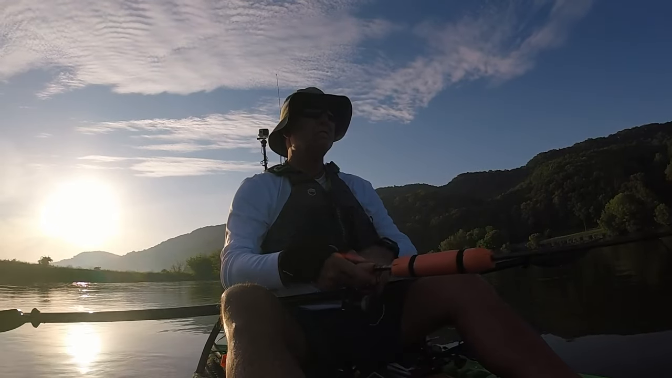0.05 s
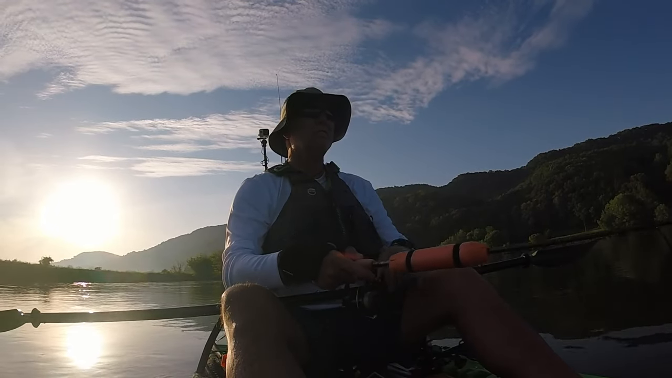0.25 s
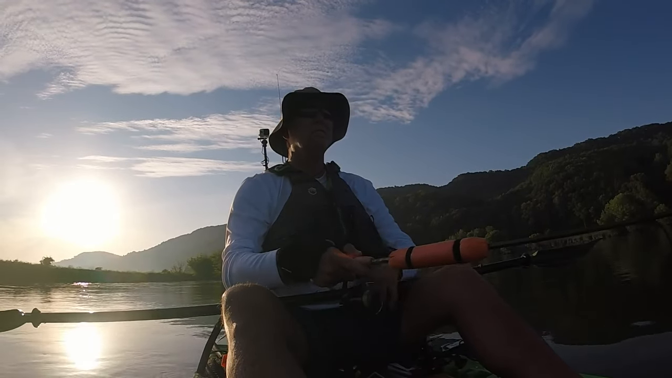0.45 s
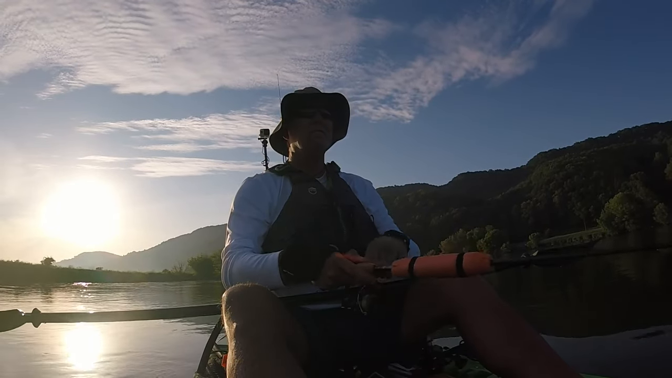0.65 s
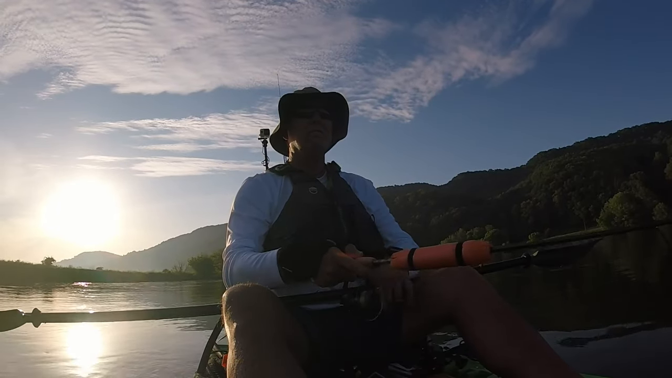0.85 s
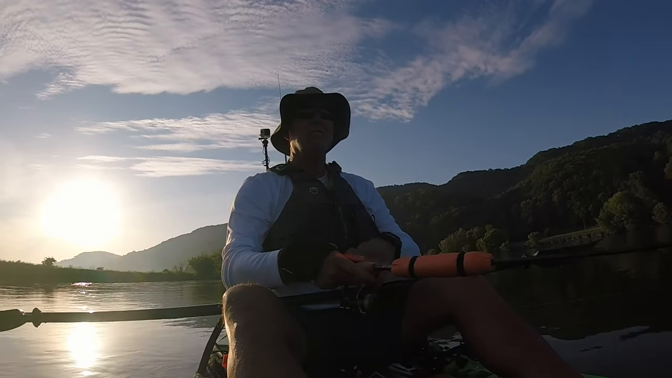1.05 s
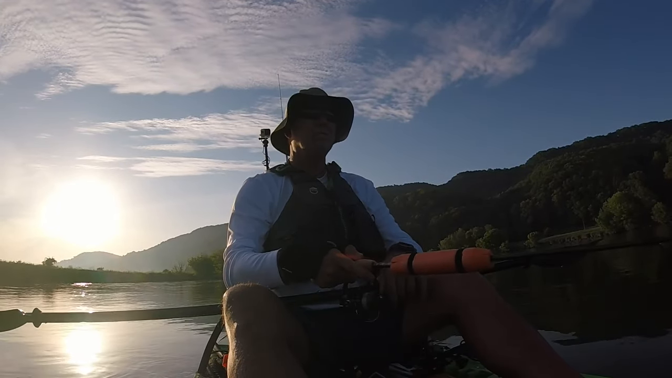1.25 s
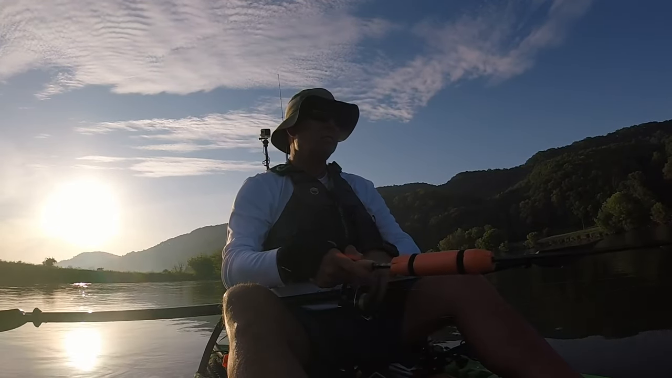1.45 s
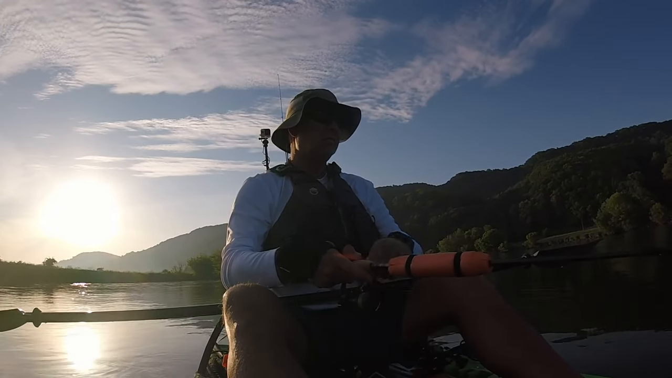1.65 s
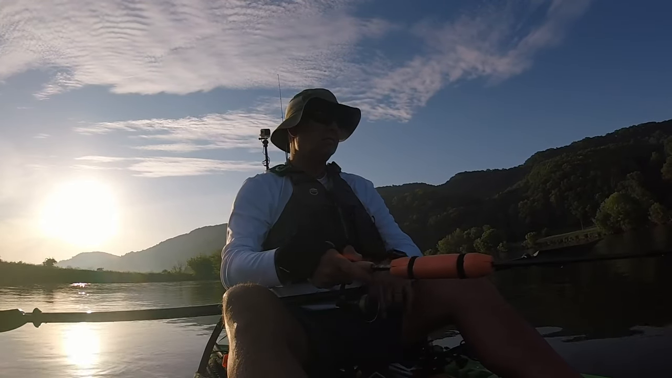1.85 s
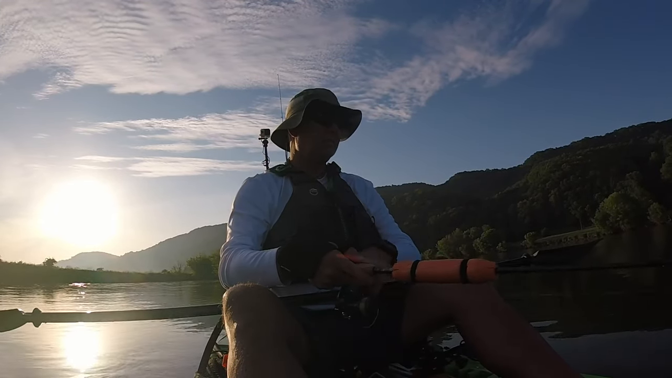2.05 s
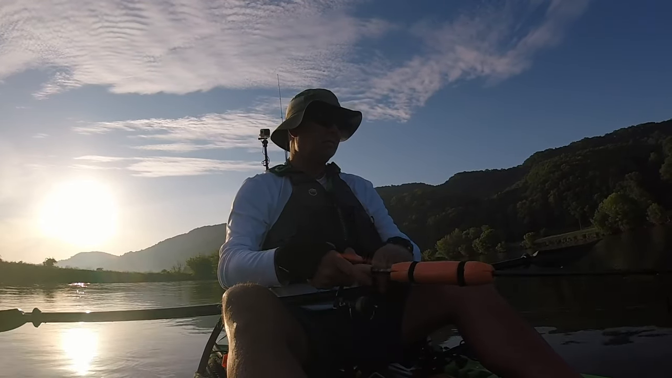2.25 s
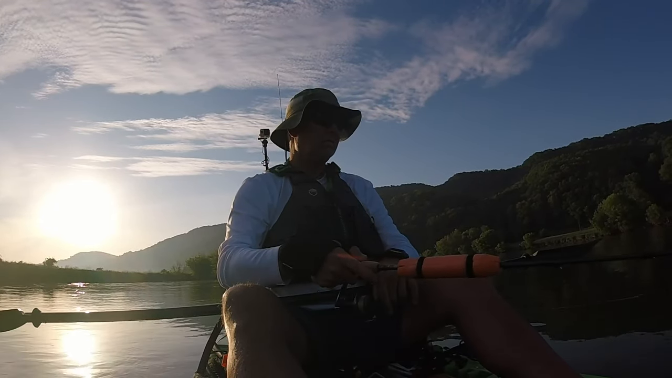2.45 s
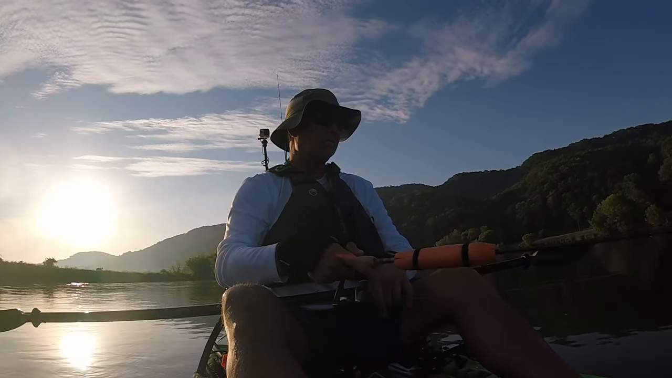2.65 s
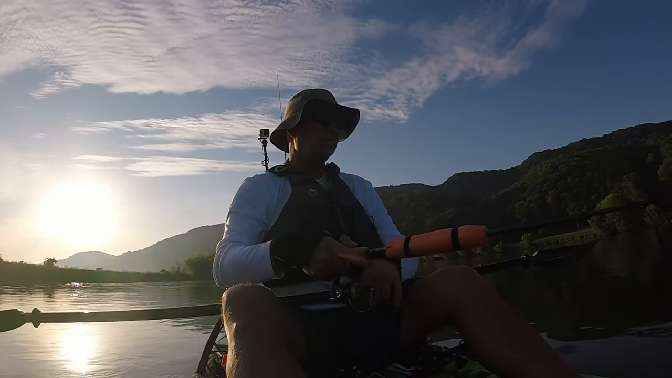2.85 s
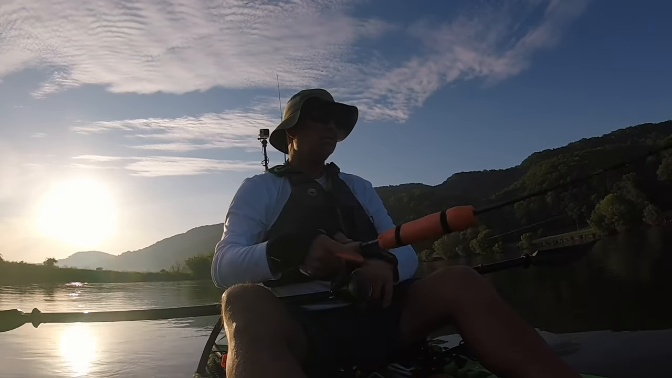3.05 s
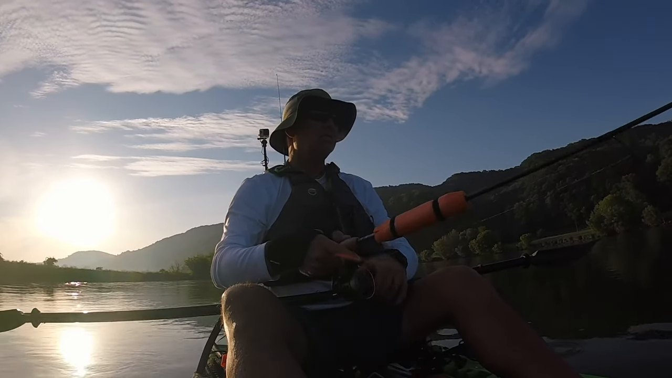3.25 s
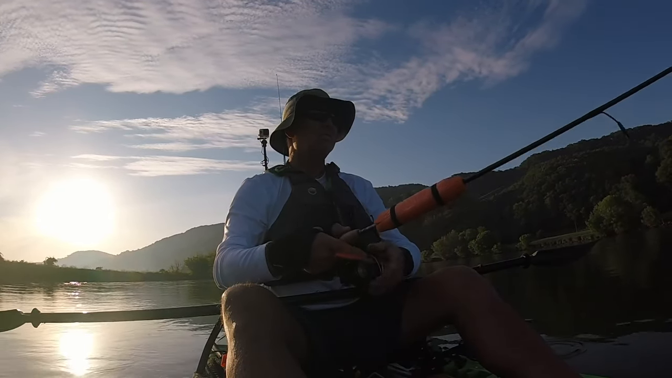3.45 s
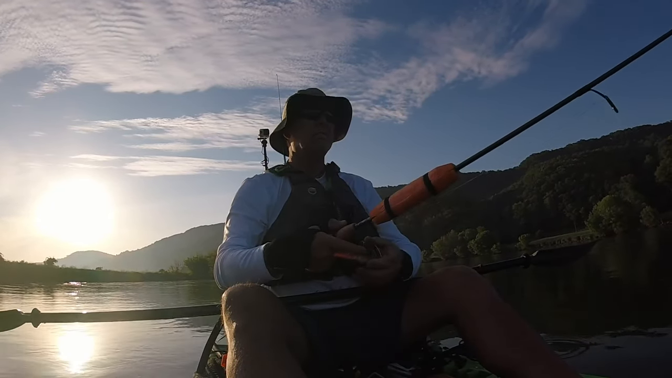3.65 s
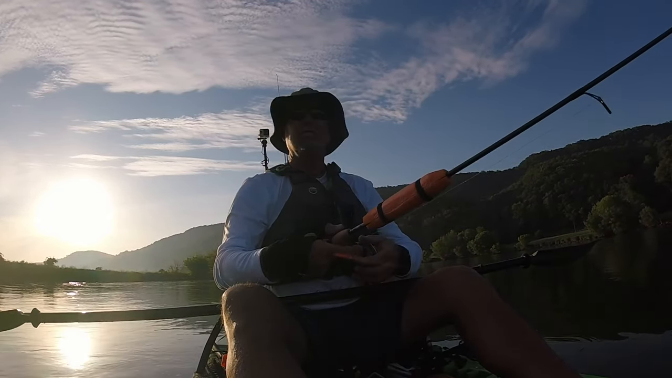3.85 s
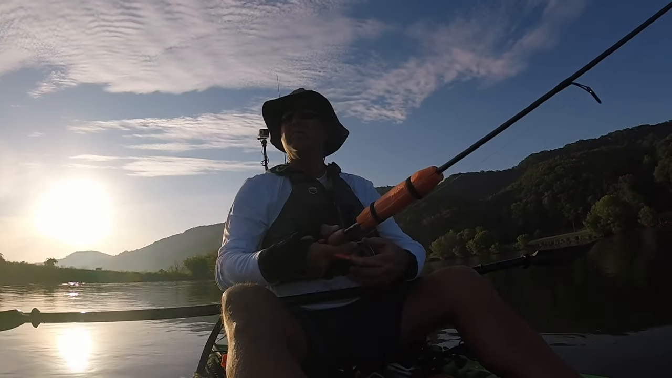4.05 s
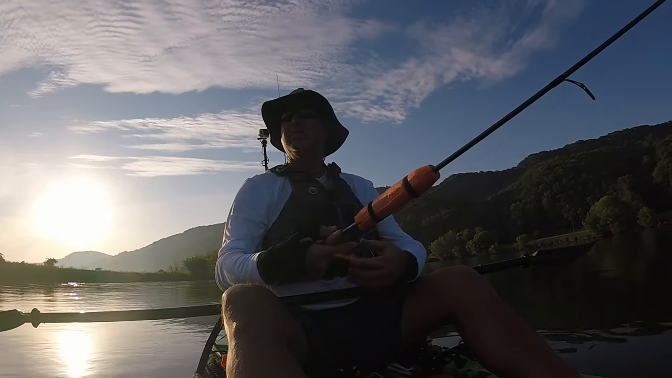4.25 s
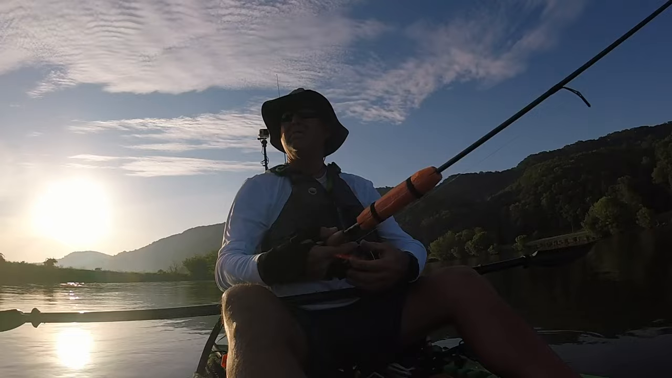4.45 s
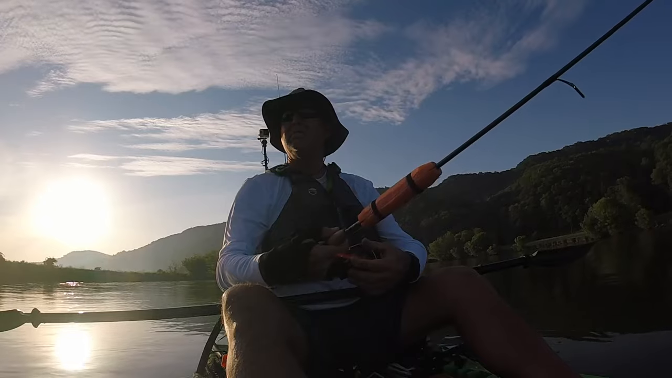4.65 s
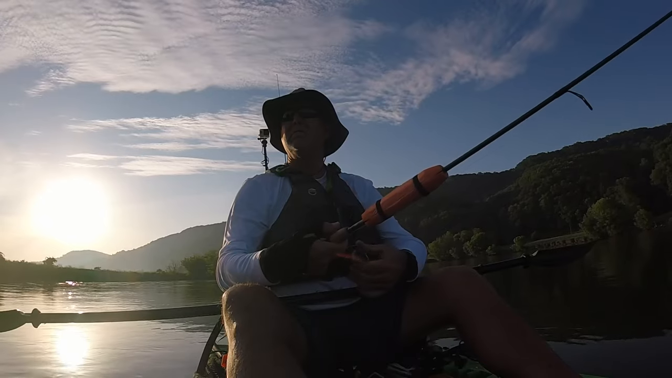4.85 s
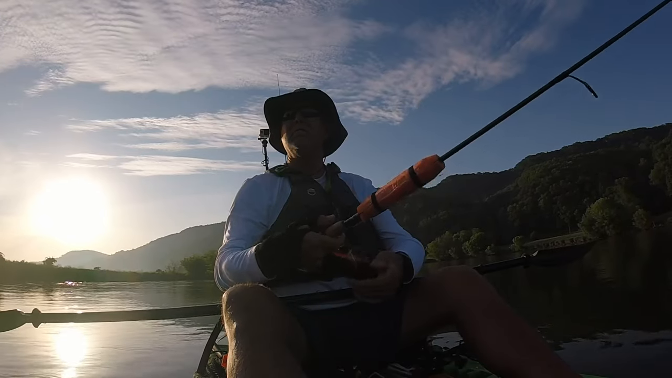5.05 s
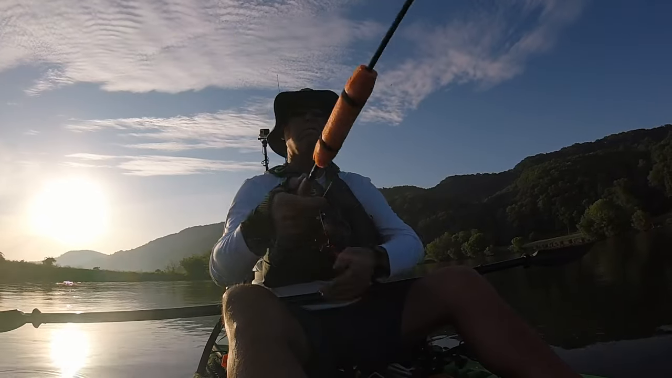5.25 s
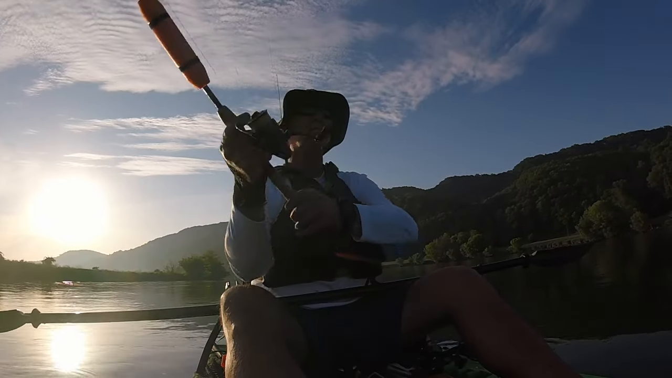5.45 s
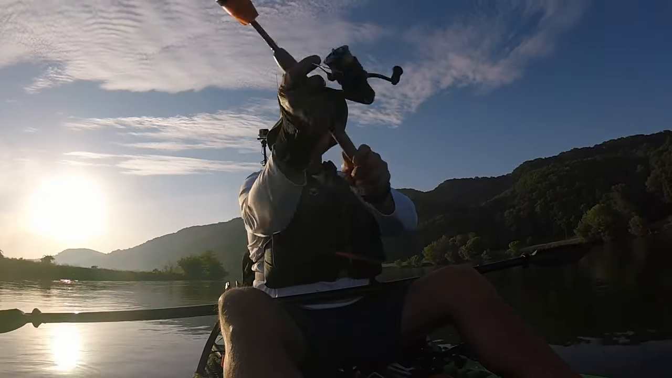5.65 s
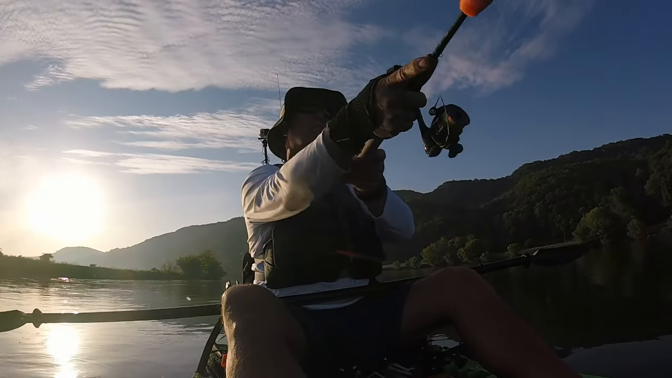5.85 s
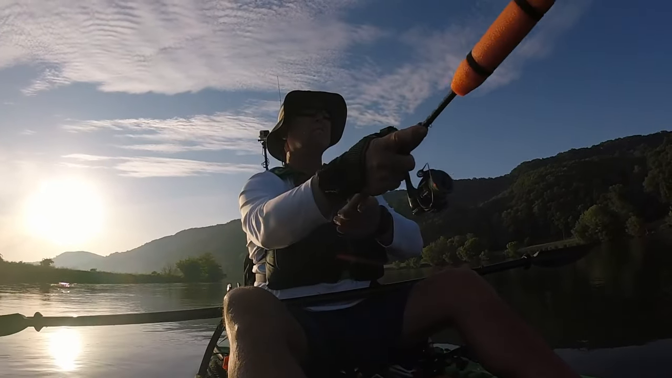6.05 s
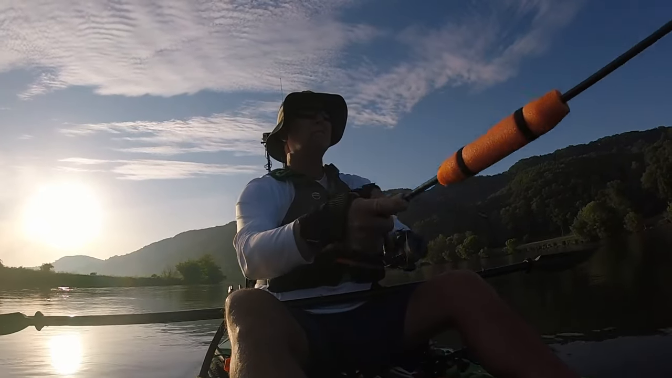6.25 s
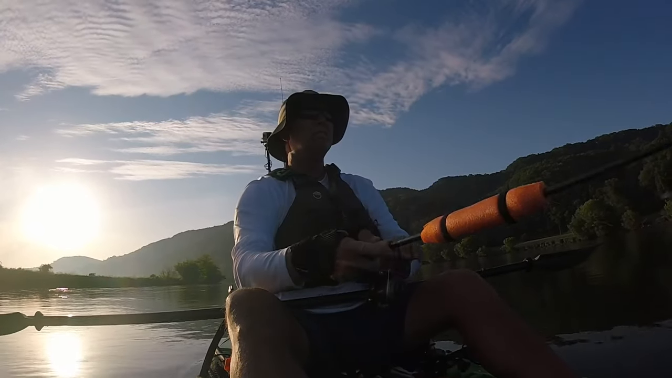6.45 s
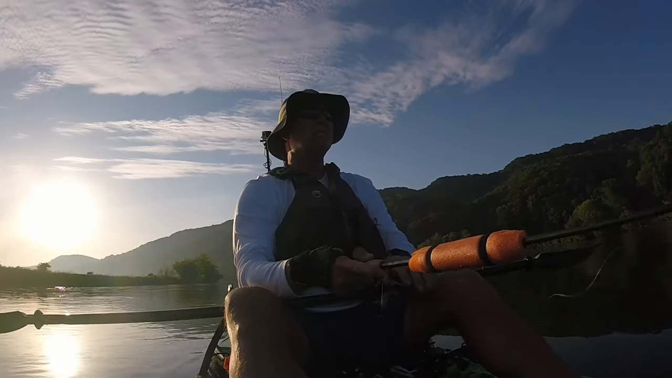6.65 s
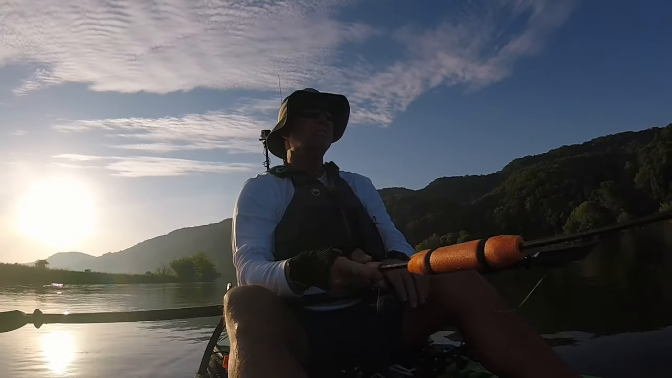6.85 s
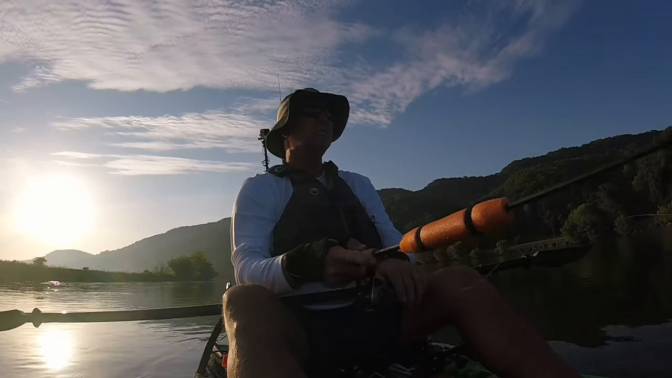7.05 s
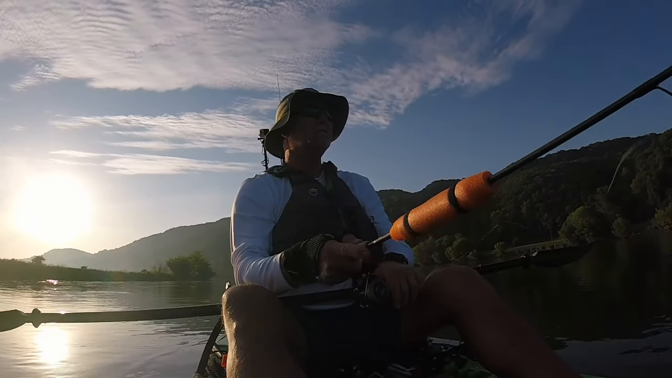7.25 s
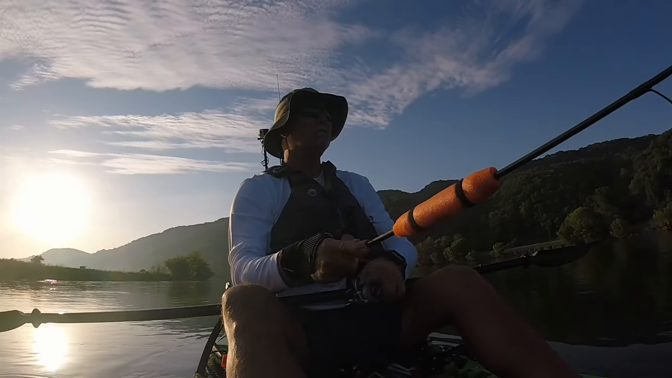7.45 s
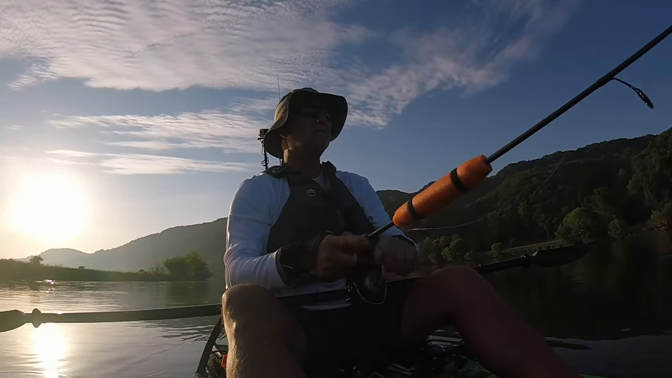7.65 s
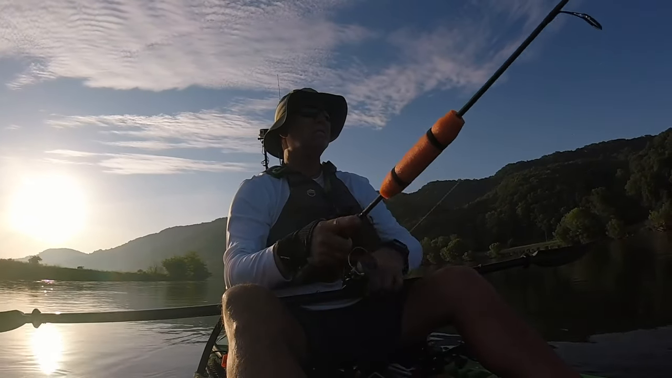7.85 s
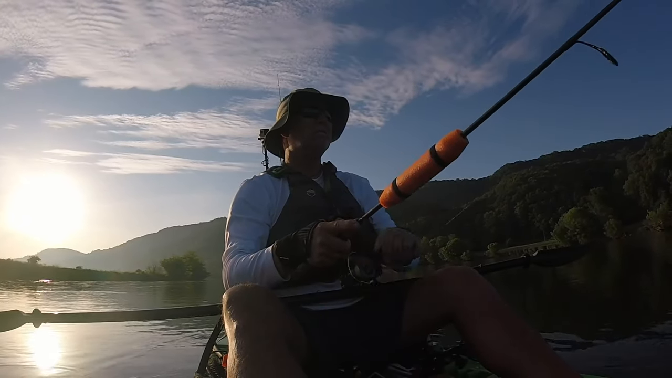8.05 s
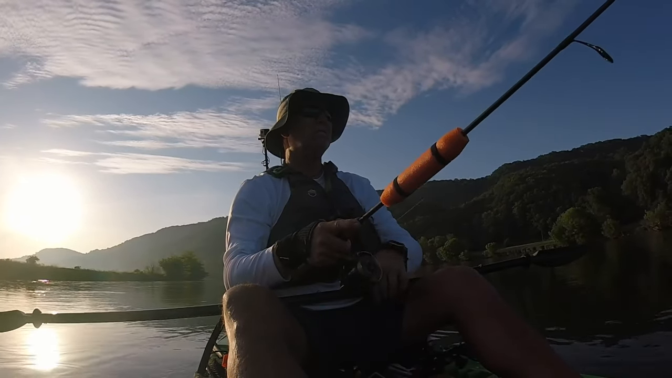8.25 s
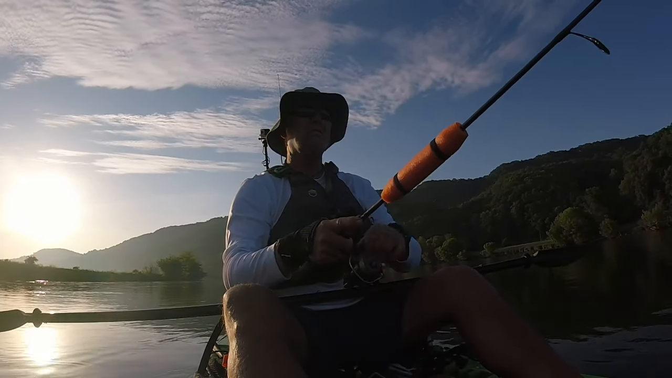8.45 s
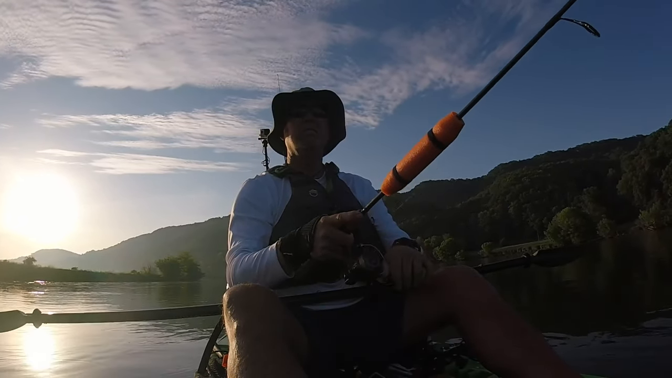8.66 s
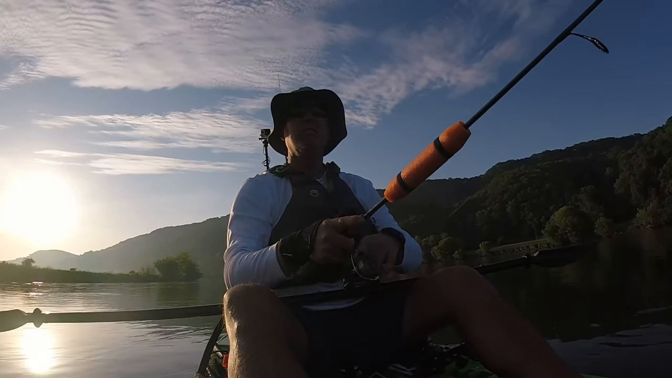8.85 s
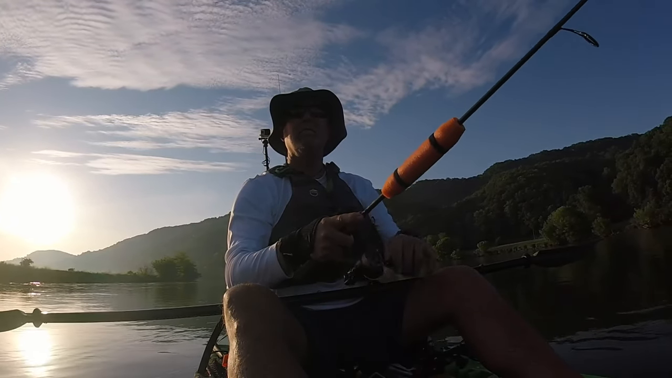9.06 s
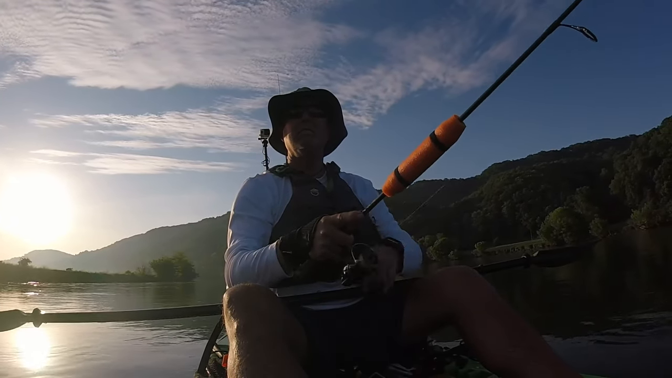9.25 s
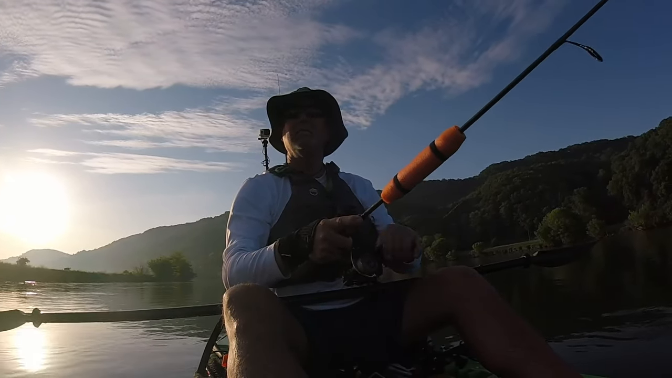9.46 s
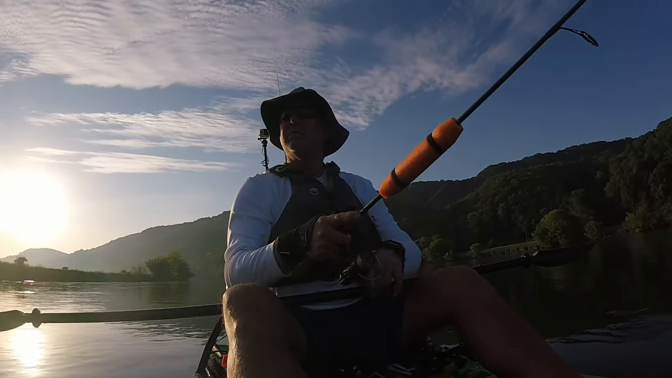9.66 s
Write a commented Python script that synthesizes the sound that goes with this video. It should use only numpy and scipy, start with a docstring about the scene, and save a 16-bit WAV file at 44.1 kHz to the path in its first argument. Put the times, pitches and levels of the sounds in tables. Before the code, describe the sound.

Quiet river air with a low wavering drone and soft hiss, heard close by a cased microphone on a kayak. From 0 to about 2.3 s a reel winds faintly, ticking and rasping, its handle moaning alternately low and high; distant birds whistle. A small double tick comes at 1.6 s, and a last low moan at 2.7. From 3 to 5 s it is nearly still, with tiny clicks and thin arching whistles. Cloth rustles from 5.2; hull thumps begin at 5.4. At 5.7 a very brief climbing swish ends in a hard woody knock and metallic rattle, and line hisses out, fading by 6.9. Little hiss puffs and rough bird calls follow. At 7.4 the bail rattles, then snaps very loudly at 7.76. From 7.85 to the end, brisk winding rasps, chirps and squeaks, with down-slurred whistles and rapid regular bird peeps from 8.5 to 9.3.

```python
"""On a still river an angler in a kayak winds in, opens the bail, casts overhead and winds again.
Gears whine and rasp as throbbing noise bands, and the handle bearing moans as gliding husky tones.
The cast swishes with a climbing band, and line hisses off the spool with a pulse for each coil.
Bail, rod and hull knock as damped modes. Birds whistle as gliding sines over a low drone.
"""
import sys
import numpy as np
from scipy import signal
from scipy.fft import rfft, irfft, next_fast_len
from scipy.io import wavfile

SR = 44100
rng = np.random.default_rng(int(sys.argv[2]) if len(sys.argv) > 2 else 0)


def dump(signal):
    """Clip the signal to [-1, 1] and save it as 16-bit WAV at the path in sys.argv[1]."""
    limited = np.clip(np.atleast_2d(signal).T, -1, 1)
    pcm = np.round(limited * 32767).astype(np.int16)
    wavfile.write(sys.argv[1], SR, pcm)


N = 428211
TIME = np.arange(N) / SR   # s

# Source levels are set ahead of the microphone case.
# modes of the reel: (frequency [Hz], level [dB], 60 dB decay time [s])
REEL_MODES = [(1200, -14, 0.0023), (2110, -27, 0.0066), (2530, -6.5, 0.0077), (3240, -6, 0.0049),
              (3730, -7, 0.0062), (4500, 0.5, 0.0029), (5020, -7.5, 0.0068), (6340, -8.5, 0.0033),
              (6900, -12, 0.0088), (7480, -5, 0.0062), (8070, -6, 0.011), (11300, -31, 0.0022),
              (10400, -31, 0.0022), (12350, -28, 0.004), (14000, -20, .003)]
NOTE_ATTACK_S = .006


def amp(db):
    """Decibels are logarithmic: 20 dB is a factor of ten in amplitude."""
    return 10 ** (np.asarray(db) / 20)


def curves(rows):
    """Linear interpolation turns columns into curves, after a gate open while the table lasts."""
    s, *columns = np.transpose(rows)
    nearest_end_s = np.minimum(TIME - s[0], s[-1] - TIME)
    gate = np.clip(nearest_end_s / .02 + (s[0] == 0), 0, 1)   # a table from 0 s starts open
    return [gate] + [np.interp(TIME, s, column) for column in columns]


def shape(x, spectrum):
    """Linear filtering: each frequency is scaled by a (frequency [Hz], level [dB]) table."""
    hz, level_db = np.transpose(spectrum)
    size = next_fast_len(N + 4000)
    bins_hz = np.maximum(np.arange(size // 2 + 1) * SR / size, 1)
    gain = amp(np.interp(np.log(bins_hz), np.log(hz), level_db))
    return irfft(rfft(x, size) * gain, size)[:N]


def coloured(spectrum, grain_db=0):
    """Filtered random noise of rms 1; grain makes single samples stand out."""
    grain = amp(grain_db * np.minimum(rng.exponential(1, N), 4))
    x = shape(rng.standard_normal(N) * grain, spectrum)
    return x / x.std()


def narrow(hz, width_hz):
    """Quadrature modulation: slow noise on a (moving) carrier makes a band of noise, rms 1."""
    low_pass = signal.butter(2, width_hz / 2, fs=SR, output="sos")
    slow = signal.sosfilt(low_pass, rng.standard_normal((2, N)))
    phase = 2 * np.pi * np.cumsum(hz + np.zeros(N)) / SR
    x = slow[0] * np.cos(phase) + slow[1] * np.sin(phase)
    return x / x.std()


def ring(force, hz, t60):
    """A damped resonator: a unit click sets a sine of height 1 ringing, 60 dB down after t60 s."""
    r, w = amp(-60 / (t60 * SR)), 2 * np.pi * hz / SR
    return signal.lfilter([0, np.sin(w)], [1, -2 * r * np.cos(w), r * r], force + 1e-18)


def swell(peak_s, peak_db, rise, fall):
    """Exponential growth and decay: gain climbs and dies evenly, in dB per s."""
    before_s, after_s = np.maximum(peak_s - TIME, 0), np.maximum(TIME - peak_s, 0)
    return amp(peak_db - rise * before_s - fall * after_s)


def add(out, s, piece):
    """Superposition: a piece is mixed in at time s."""
    i = round(s * SR)
    out[i:i + len(piece)] += piece[:N - i]


def background():
    """Random amplitude modulation: low noise bands waver as a drone and buffet as wind and hull motion."""
    # low drone: (frequency [Hz], width [Hz], level [dB])
    drone_bands = [(168.1, 37, -55), (239.2, 7.5, -54.5), (295, 14.3, -64.5), (326.7, 8.3, -65),
                   (347.2, 29, -64)]
    # wind and hull movement at the microphone: (time [s], level [dB])
    buffet_levels = [(4.4, -59.5), (5.4, -47), (5.75, -43), (6.4, -44), (6.7, -48), (8.0, -47.5),
                     (9.71, -49)]
    gate, buffet_db = curves(buffet_levels)
    drone = 0
    for hz, width_hz, db in drone_bands:
        drone = drone + amp(db + 1.82 * narrow(0.415, 0.64)) * narrow(hz, width_hz)
    rumble = narrow(175, 115) + amp(-12.0) * narrow(335, 42)
    return drone + gate * amp(buffet_db + 1.7 * narrow(4, 6.4)) * rumble


def moan(hz, blur_share):
    """Complex modulation: a gliding carrier bears slow noise, a narrow core inside a wider blur."""
    white = rng.standard_normal((2, N)) + 1j * rng.standard_normal((2, N))
    core = signal.sosfilt(signal.butter(2, 24, fs=SR, output="sos"), white[0])
    blur = signal.sosfilt(signal.butter(2, 140, fs=SR, output="sos"), white[1])
    husk = .3 + core / core.std() + blur_share * blur / blur.std()   # .3 is the steady tone
    return np.real(husk * np.exp(2j * np.pi * np.cumsum(hz) / SR))


def chorus():
    """Incoherent addition of far birds: husky strands wander in pitch and come and go."""
    level = amp(-65 - 1.5 * TIME)   # fades by 1.5 dB per s
    out = 0
    for hz in (2150, 2850, 3400):
        presence = np.clip(narrow(1.5, 4) - .4, 0, 1)
        out = out + presence * moan(hz * (1 + .04 * narrow(2, 4)), .5)
    return level * out


def winding():
    """Periodic modulation: gear whine and grainy rasp throb once per rotor turn, the treble in patches."""
    # spells of winding, each of rows: (time [s], whine level [dB], rasp level [dB])
    spells = [
        [(0, -79, -63.5), (2.2, -89, -65), (2.4, -96, -82), (3.2, -100, -68)],
        [(7.79, -57, -64), (7.85, -61, -52), (8.5, -62.5, -53.5), (9.2, -60, -52), (9.71, -65, -52)],
    ]
    # gear rasp: (frequency [Hz], spectral density [dB per Hz])
    rasp_colour = [(700, -11), (1100, -2), (1600, -4.5), (1850, 6.5), (2050, -2.5), (2300, 3), (2600, 4),
                   (3400, -1.5), (4250, -5), (5700, -1.5), (6300, -1), (8700, -1.5), (9300, -15.5),
                   (12000, -15), (16000, -58)]
    rotor_turns_per_s = 12.8
    turn = np.cos(2 * np.pi * rotor_turns_per_s * TIME + 2.0 + 0.56 * narrow(0.388, 1.0))
    out = 0
    for rows in spells:
        gate, whine_db, rasp_db = curves(rows)
        whine = amp(whine_db + 2 * turn + 1.5 * narrow(12, 20)) * narrow(5130, 190)
        patches = sum(amp(5 * turn + 3.5 * narrow(15, 25)) * narrow(hz, 500)
                      for hz in (6350, 7000, 7700, 8400))
        strands = sum(amp(4 * narrow(2, 4)) * narrow(hz * (1 + .02 * narrow(2, 3)), 150)
                      for hz in (2300, 2750, 3600))   # wandering in pitch
        rasp = amp(0.52 * turn + 2.0 * narrow(20, 30)) * coloured(rasp_colour, grain_db=4.5)
        rasp = rasp + amp(-15.5) * patches + amp(-13.5) * strands
        out = out + gate * (whine + amp(rasp_db) * rasp)
    return out


def moans():
    """Bearing friction: the handle moans low, then high once a slow turn, both together when fast."""
    # slow winding: (time [s], level [dB])
    slow_levels = [(0, -62), (1.5, -60.5), (2.2, -64), (2.55, -73)]
    # fast winding: (time [s], low moan [Hz], its level [dB], high moan [Hz], its level [dB])
    fast_tracks = [(7.85, 1880, -69, 2454, -51), (8.1, 1850, -58, 2300, -64), (8.25, 1830, -68, 2217, -60),
                   (8.45, 1760, -59.5, 2420, -56), (8.72, 1735, -58, 2480, -81),
                   (8.81, 1875, -47, 2270, -55), (8.93, 1890, -55, 2300, -70), (9.08, 1720, -63, 2500, -53),
                   (9.22, 1825, -55, 2210, -65), (9.42, 1810, -62, 2430, -57), (9.55, 1886, -61, 2500, -60),
                   (9.71, 1815, -51.5, 2370, -73)]
    # moans of a slow turn: (place in the turn [0-1], first frequency [Hz], last [Hz], level [dB])
    strokes = [(0, 1942, 1800, 1.5), (.49, 2530, 2475, -0.5)]
    turn_s, first_turn_s, moan_share = .795, -.2, .44   # share of a turn that one moan lasts
    gate, slow_db = curves(slow_levels)
    fast, low_hz, low_db, high_hz, high_db = curves(fast_tracks)
    out = fast * (amp(low_db) * moan(low_hz, 0.2) + amp(high_db) * moan(high_hz, 0.72))
    for place, first_hz, last_hz, db in strokes:
        turn_place = ((TIME - first_turn_s) / turn_s - place) % 1
        u = np.minimum(turn_place / moan_share, 1)   # progress of the moan
        edges = np.minimum(14 * np.minimum(u, 1 - u), 1) * amp(2 * narrow(5, 10))
        hz = first_hz + (last_hz - first_hz) * u + 35 * narrow(5, 8)
        out += gate * amp(slow_db + db) * edges * moan(hz, 1.05)
    return out


def meshing():
    """Periodic excitation: gear teeth chirp narrow hiss as they mesh, every second one stronger."""
    # runs of chirps: (start [s], end [s], rate [per s], level [dB])
    runs = [(0.01, 2.3, 24.2, -69.5), (7.859, 9.62, 25.6, -56)]
    chirp_s, chirp_hz, width_hz = 0.019, 5200, 360
    out, t = np.zeros(N), TIME[:round(chirp_s * SR)] / chirp_s
    envelope = np.sqrt(np.clip(np.minimum(8 * t, 1) * (1 - t), 0, 1))
    for start, end, rate, db in runs:
        for k, (late, strength) in enumerate(rng.standard_normal((60, 2))):
            s = start + k / rate
            if s < end:
                chirp_db = db + 3 * (k % 2) + 2.5 * strength
                add(out, s + .009 * abs(late), amp(chirp_db) * envelope)
    return out * narrow(chirp_hz + 130 * narrow(8, 12), width_hz)


def note(length, first_hz, middle_hz, last_hz, db):
    """Frequency modulation: a tone glides along a parabola, with quick start and fading end."""
    u = np.linspace(-1, 1, round(length * SR))
    bend_hz = (first_hz + last_hz) / 2 - middle_hz
    hz = middle_hz + (last_hz - first_hz) / 2 * u + bend_hz * u ** 2
    envelope = np.minimum(TIME[:len(u)] / NOTE_ATTACK_S, 1) * (1 - u) ** .15
    return amp(db) * envelope * np.sin(2 * np.pi * np.cumsum(hz) / SR)


def slur(first_hz, db):
    """Cubic frequency glide: joins a common fall at its first pitch and gains strength on the way."""
    top_hz, end_hz, hz_per_s3 = 5250, 2950, 1300000
    drop_hz = np.maximum(top_hz - np.array([first_hz, end_hz]), 0)
    start, end = np.cbrt(drop_hz / hz_per_s3)
    t = np.arange(start, end, 1 / SR)
    edges = np.minimum(np.minimum(t - start, end - t) / NOTE_ATTACK_S, 1)
    hz = top_hz - hz_per_s3 * t ** 3
    return amp(db + np.linspace(-2.5, 4.0, len(t))) * edges * np.sin(2 * np.pi * np.cumsum(hz) / SR)


def arch(db):
    """Symmetric frequency glide: a whistle climbs and falls, strongest on top."""
    length_s, low_hz, top_hz = .14, 3150, 4980
    u = np.abs(np.linspace(-1, 1, round(length_s * SR)))
    hz = top_hz - (top_hz - low_hz) * u ** 1.42   # power 1: pointed top, 2: round
    return amp(db - 6.2 * u) * np.minimum(8 * (1 - u), 1) * np.sin(2 * np.pi * np.cumsum(hz) / SR)


def birds_and_last_moan():
    """Tone synthesis and reflection: bird calls and the handle's last low moan, with a diffuse tail."""
    # plain whistles: (time [s], length [s], first frequency [Hz], last frequency [Hz], level [dB])
    whistles = [(.104, 0.12, 3060, 3140, -72), (.21, 0.057, 3220, 2920, -66), (.4, 0.15, 2820, 2870, -72),
                (0.606, 0.17, 2900, 2820, -69), (2.206, 0.043, 3630, 3510, -66),
                (2.433, .03, 2500, 2600, -67), (2.478, 0.043, 2490, 2800, -63),
                (2.718, 0.084, 3150, 2600, -73), (2.856, 0.023, 2300, 2840, -57.5),
                (3.07, 0.18, 3510, 3430, -69), (3.067, 0.14, 7020, 6900, -68),
                (3.143, 0.04, 2660, 2500, -65), (3.165, 0.06, 3180, 3080, -65),
                (3.466, 0.105, 4500, 4250, -76), (4.19, .025, 2750, 2700, -71),
                (4.515, 0.016, 3030, 3150, -77), (4.6, .035, 4150, 4080, -78),
                (4.798, 0.026, 3450, 3420, -65), (5.08, .12, 3950, 4100, -74),
                (6.993, 0.065, 7000, 7000, -60), (7.065, 0.061, 2650, 2090, -64),
                (7.5, 0.48, 2790, 2820, -60.5), (7.668, 0.029, 8060, 7300, -51.5),
                (7.706, 0.067, 5270, 5150, -40.5), (7.784, .03, 5250, 5200, -55),
                (8.113, 0.041, 7250, 7240, -49), (8.172, 0.085, 5136, 4950, -42),
                (8.27, 0.12, 5050, 4950, -51), (8.435, 0.061, 3293, 3240, -52)]
    # down-slurs of one bird: (time [s], first frequency [Hz], level [dB])
    slurs = [(1.955, 4970, -73), (2.283, 5000, -69), (2.61, 4970, -71), (4.65, 5000, -79),
             (8.268, 4940, -54), (8.612, 4650, -49), (8.913, 5080, -49.5), (9.255, 4890, -50)]
    # up-and-down whistles: (time [s], level [dB])
    arches = [(4.727, -67), (5.013, -62.5), (5.288, -65)]
    # short peeps of one bird: (time [s], level [dB])
    peeps = [(8.5535, -44), (8.6448, -47), (8.726, -41.5), (8.8139, -42.5), (8.9013, -44.5), (8.988, -45),
             (9.0713, -46), (9.16, -43.5), (9.251, -45), (9.3427, -44.5), (9.6525, -54)]
    # buzzy trills of birds, and at 2.72 s the handle's last low moan:
    # (time [s], length [s], frequency [Hz], level [dB])
    buzzy_tones = [(2.72, 0.31, 1870, -65), (4.238, 0.11, 2414, -63), (6.093, 0.23, 2620, -62),
                   (6.462, 0.1, 1930, -59), (7.795, 0.21, 4050, -43)]
    # harsh calls of several strands: (time [s], length [s], main strand [Hz], level [dB])
    harsh_calls = [(6.983, 0.065, 3110, -55.5), (7.31, 0.052, 3090, -53.5), (7.553, 0.078, 3080, -56)]
    peep_hz, peep_s = 3397, 0.014
    echo_s, echo_db = 0.051, -12   # off the near bank
    buzz_per_s, buzz_attack_s = 100, .035
    strand_hz = 320   # spacing
    out, husk = np.zeros(N), narrow(100, 220)
    for s, length, first_hz, last_hz, db in whistles:
        add(out, s, note(length, first_hz, (first_hz + last_hz) / 2, last_hz, db))
    for s, first_hz, db in slurs:
        add(out, s, slur(first_hz, db))
    for s, db in arches:
        add(out, s, arch(db))
        add(out, s + echo_s, arch(db + echo_db))
    for s, db in peeps:
        add(out, s, note(peep_s, peep_hz * 1.02, peep_hz, peep_hz * .98, db))
    for s, length, hz, db in buzzy_tones:
        tone = note(length, .975 * hz, hz, .99 * hz, db)
        at, t = round(s * SR), TIME[:len(tone)]
        fade = np.linspace(1, .3, len(tone)) * np.minimum(t / buzz_attack_s, 1)
        buzz = .6 + .6 * np.cos(2 * np.pi * buzz_per_s * t) + .75 * husk[at:at + len(tone)]
        add(out, s, tone * fade * buzz)
    for s, length, hz, db in harsh_calls:
        call = 0
        for step, loss_db in ((0, 0), (-1, 3), (1, 9), (-2, 12)):
            f = hz + step * strand_hz
            call = call + note(length, .99 * f, f, .95 * f, db - loss_db)
        roughness = .9 + .45 * husk[round(s * SR):][:len(call)]
        add(out, s, call * np.linspace(1, .4, len(call)) * roughness)
    out *= amp(1.5 * narrow(40, 60))   # flutter, as air turbulence gives far tones
    tail = rng.standard_normal(6000) * amp(-60 * TIME[:6000] / 0.11 - 31.5)   # 60 dB in 0.11 s
    return out + signal.fftconvolve(out, tail)[:N]


def ticks():
    """Modal excitation: a blow with a dying rattle rings the reel modes near its centre."""
    # bail, handle and guides: (time [s], peak level [dB], centre [Hz], spread [octaves])
    blows = [(1.601, -32.5, 2200, 1.1), (1.671, -42, 3400, 0.15), (2.781, -45.5, 3200, 0.27),
             (3.14, -40, 2000, 0.62), (3.72, -40, 4500, 0.82), (4.012, -46, 5400, 0.11),
             (4.131, -50, 3600, 0.15), (4.877, -33, 6440, 0.14), (5.7218, -15.5, 3000, 0.5),
             (5.7326, -11.5, 6600, 0.092), (5.743, -23, 3500, .3), (5.751, -21, 5500, 0.66),
             (7.391, -26.5, 7000, 0.6), (7.426, -32, 5000, 0.87), (7.447, -18.5, 6440, 0.16),
             (7.5943, -25.5, 5500, 1.3), (7.7265, -23, 4970, 0.5), (7.764, -1, 6300, 0.6),
             (7.766, -31, 4500, 1), (9.225, -34.5, 1200, 0.33)]
    rattle_t60_s = 0.016
    t, out = TIME[:2500], np.zeros(N)
    rattles = rng.standard_normal((len(blows), 2500)) * (rng.random((len(blows), 2500)) < .12)
    variations = rng.standard_normal((len(blows), len(REEL_MODES)))
    for (s, peak_db, centre_hz, octaves), rattle, variation in zip(blows, rattles, variations):
        blow = (t == 0) + .45 * rattle * amp(-60 * t / rattle_t60_s)
        tick = 0
        for (hz, db, t60), vary in zip(REEL_MODES, variation):
            distance = np.log2(hz / centre_hz) / max(octaves, .1)
            tick = tick + amp(db - 6 * distance ** 2 + 2 * vary) * ring(blow, hz, t60)
        add(out, s, amp(peak_db) * tick / np.abs(tick).max())
    return out


def knocks():
    """Free damped vibration: hull, rod and reel seat each ring as one mode after a blow."""
    # thumps on the hull: (time [s], peak level [dB])
    thumps = [(5.439, -26), (5.65, -25), (5.798, -30), (5.816, -29), (5.84, -27.5), (6.041, -31),
              (6.117, -29), (6.384, -29)]
    # the rod knocks in the hands: (time [s], peak level [dB], frequency [Hz])
    rod_knocks = [(1.602, -40, 900), (5.707, -16, 600), (5.7201, -3, 1320), (5.7225, -7.5, 335),
                  (5.769, -19, 696), (5.78, -22, 600), (5.793, -12.5, 754), (7.45, -21, 407)]
    # pings of the reel seat: (time [s], peak level [dB])
    pings = [(1.757, -48.5), (3.255, -46), (7.4488, -26), (7.4516, -21.5), (7.461, -26)]
    hull_hz, hull_t60_s = 180.4, 0.13
    seat_hz, seat_t60_s = 1930, 0.029
    rod_cycles = 3.17   # to die by 60 dB
    out, click = np.zeros(N), TIME[:15000] == 0
    for s, peak_db in thumps:
        add(out, s, -amp(peak_db) * ring(click, hull_hz, hull_t60_s))
    for s, peak_db, hz in rod_knocks:
        add(out, s, -amp(peak_db) * ring(click, hz, rod_cycles / hz))
    for s, peak_db in pings:
        add(out, s, -amp(peak_db) * ring(click, seat_hz, seat_t60_s))
    return out


def cast():
    """Vortex shedding and friction: tip swish, air rush, line slapping the first guide, rubbing cloth."""
    # sleeves and vest rubbing: (time [s], level [dB])
    cloth_levels = [(5.2, -72), (5.33, -62), (5.75, -56.5), (6.15, -64.5), (6.7, -58.5), (7.33, -59),
                    (7.48, -66), (7.8, -66)]
    # rush of air: (frequency [Hz], spectral density [dB per Hz])
    rush_colour = [(150, -29), (250, -21), (401, -13.5), (2200, -20.5), (3090, -22), (3450, -22),
                   (4500, -30), (5850, -77), (9900, -120)]
    # line leaving the spool: (time [s], hiss centre [Hz], level [dB])
    line_track = [(5.63, 6900, -57), (5.7, 7300, -48), (5.95, 8370, -53), (6.12, 8480, -49),
                  (6.3, 7750, -50.5), (6.7, 6220, -60.5), (6.95, 6630, -97)]
    # swells: time [s], peak [dB], rise and fall [dB per s]
    tip = swell(5.697, -35.5, 390, 1800)    # tip at its fastest
    arms = swell(5.7, -48.5, 61, 33.5)      # arms at their fastest
    whip = swell(5.722, -28, 3100, 440)     # rod snaps straight
    # the tip speeds up evenly, so its whistle climbs evenly between its limits
    whistle_start_s, climb_hz_per_s = 5.65, 58000
    vortex_hz = np.clip(climb_hz_per_s * (TIME - whistle_start_s), 250, 3300)
    flutter = amp(2.5 * narrow(90, 150))
    swish = tip * flutter * (narrow(vortex_hz, 900) + amp(-7) * narrow(.7 * vortex_hz, 1600))

    moving, cloth_db = curves(cloth_levels)
    rush = (arms + whip + moving * amp(cloth_db - 2.0)) * coloured(rush_colour)

    gate, hiss_hz, hiss_db = curves(line_track)
    coils = 1 + 0.13 * np.cos(2 * np.pi * 132 * TIME)   # one slap per coil, 132 a second
    hiss = narrow(hiss_hz, 2140) + amp(-20) * narrow(9100, 3500) + amp(-7.5) * narrow(13500, 4600)
    line = gate * coils * (amp(hiss_db) + amp(-19) * whip) * hiss

    rub = narrow(4870, 940) + amp(-6) * narrow(7200, 2500)
    cloth = moving * amp(cloth_db + 1.8 * narrow(9, 31)) * rub
    return swish + rush + line + cloth


def grinds():
    """Random impact excitation: dense uneven clicks drive the same reel modes."""
    # loose parts at the release and as the bail wire rides over its cam:
    # (time [s], hold [s], level [dB], tilt [dB per octave])
    spells = [(5.73, 0.014, -40.5, 6.5), (7.412, 0.06, -55.5, -8), (7.444, 0.013, -33.5, -4.5)]
    rise_db_per_s, fall_db_per_s, top_hz = 2400, 1900, 8400
    out = np.zeros(N)
    for s, hold, grind_db, tilt_db in spells:
        t = TIME[:4000] - .01   # the rise leads the stated time
        level_db = grind_db + rise_db_per_s * np.minimum(t, 0)
        level_db = level_db - fall_db_per_s * np.maximum(t - hold, 0)
        clicks = rng.random(4000) < 6000 / SR   # some 6000 a second
        grit = rng.standard_normal(4000) * clicks * amp(level_db)
        for hz, mode_db, t60 in REEL_MODES:
            drive = grit * amp(mode_db + tilt_db * np.log2(hz / 4500))
            add(out, s + t[0], ring(drive, hz, t60))
    return signal.sosfilt(signal.butter(4, top_hz, fs=SR, output="sos"), out)


def puffs():
    """Turbulent noise: loose line passes the guides in short smooth bursts of hiss."""
    # loose line through the guides: (time [s], length [s], level [dB])
    bursts = [(6.85, .02, -54), (6.977, 0.031, -55), (7.164, .069, -52.5), (7.27, 0.077, -55.5)]
    out, hiss = np.zeros(N), narrow(7300, 2400)
    for s, length, db in bursts:
        at, size = round(s * SR), round(length * SR)
        add(out, s, amp(db) * np.hanning(size) * hiss[at:at + size])
    return out


def scene():
    """Superposition at one cased microphone feeding both channels, with added hiss of opposite sign."""
    # quiet air and microphone hiss: (frequency [Hz], spectral density [dB per Hz])
    air_colour = [(20, -25), (35, -25.5), (95, -30), (150, -2), (210, -4.5), (300, -12), (500, -14.5),
                  (1000, -21.5), (2500, -29), (3700, -35.5), (4800, -45.5), (6300, -33.5), (8500, -31),
                  (11000, -37.5), (15400, -41)]
    # microphone case: (frequency [Hz], gain [dB])
    housing = [(40, -20), (100, -40), (135, -1.5), (5200, 0), (5850, -2), (6400, 2), (8800, -2.5),
               (10500, 0), (15000, -17)]
    high_pass = signal.butter(2, 800, "high", fs=SR, output="sos")
    metal = signal.sosfilt(high_pass, ticks() + grinds())   # small parts radiate no bass
    sources = background() + chorus() + winding() + moans() + meshing() + birds_and_last_moan()
    sources = sources + metal + knocks() + cast() + puffs()
    mono = shape(sources, housing) + amp(-51.5) * coloured(air_colour)
    hiss = amp(-86.5) * rng.standard_normal(N) + amp(-93.5) * coloured(air_colour)
    return mono + hiss * np.array([[1], [-1]])


def record(dry):
    """Band limitation: a steep low-pass is 60 dB down from its stop edge upward."""
    stop_hz = 15862
    return signal.sosfilt(signal.cheby2(12, 60, stop_hz, fs=SR, output="sos"), dry)


dry = scene()
out = record(dry)
dump(out)
```